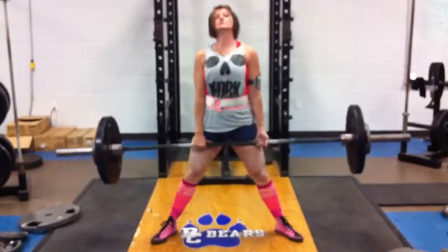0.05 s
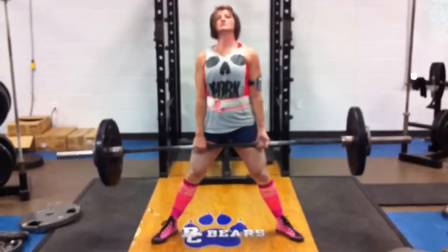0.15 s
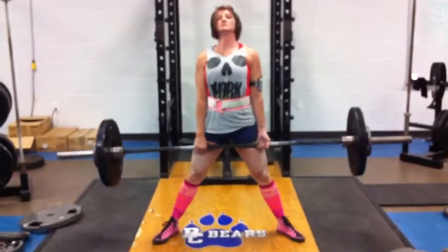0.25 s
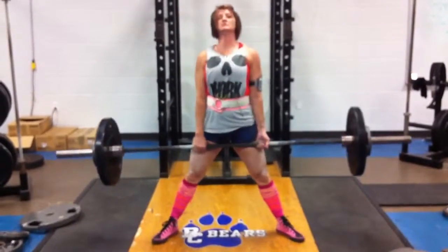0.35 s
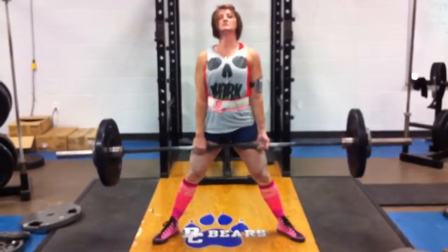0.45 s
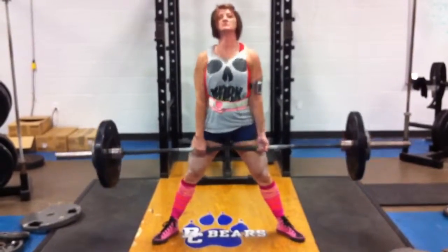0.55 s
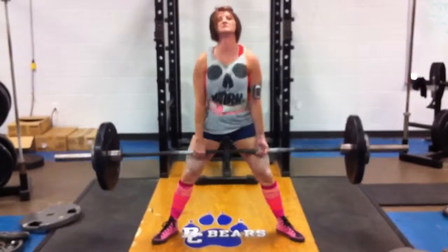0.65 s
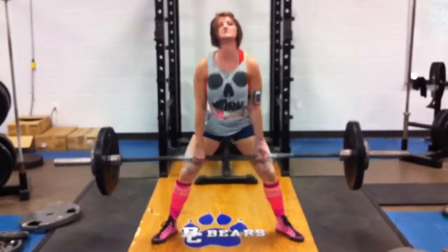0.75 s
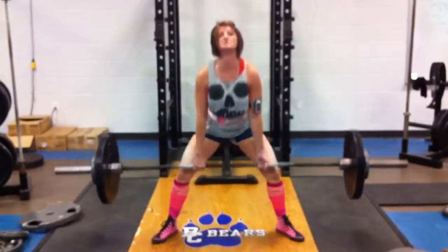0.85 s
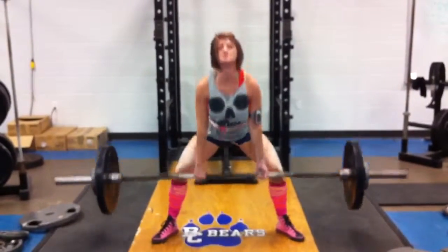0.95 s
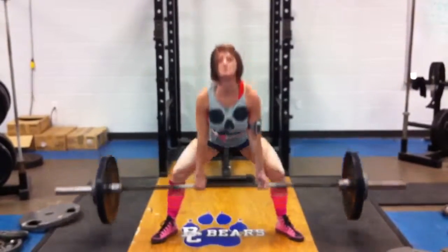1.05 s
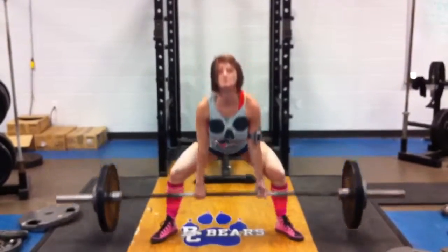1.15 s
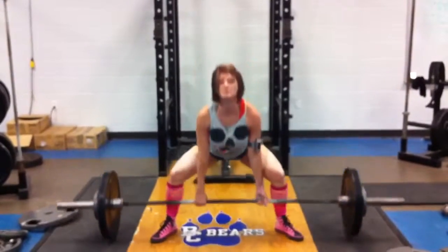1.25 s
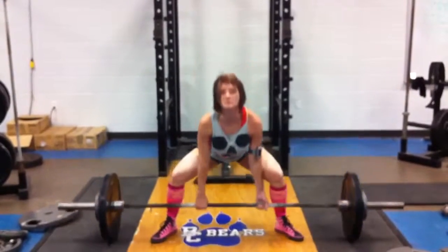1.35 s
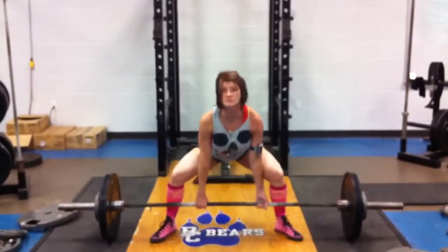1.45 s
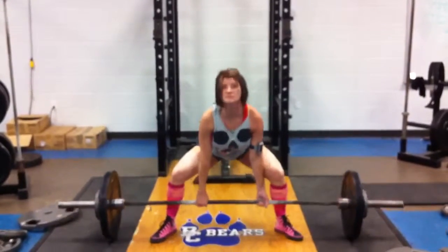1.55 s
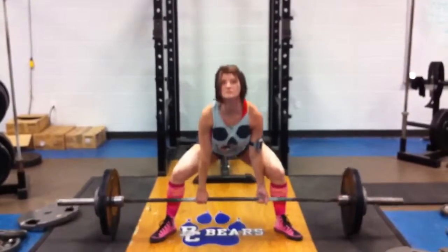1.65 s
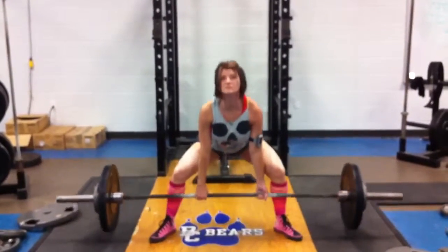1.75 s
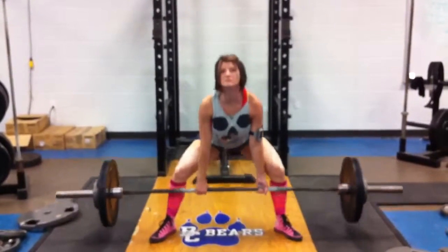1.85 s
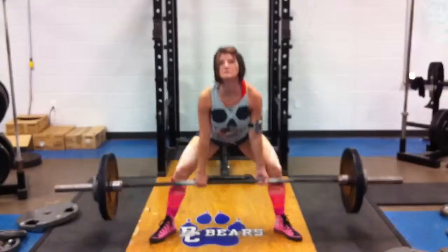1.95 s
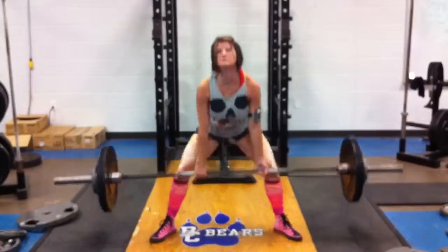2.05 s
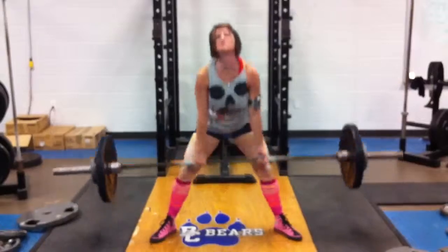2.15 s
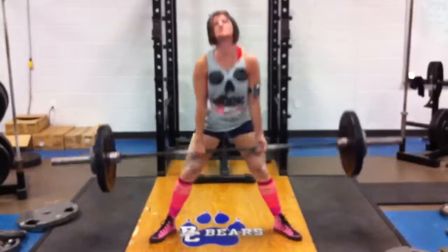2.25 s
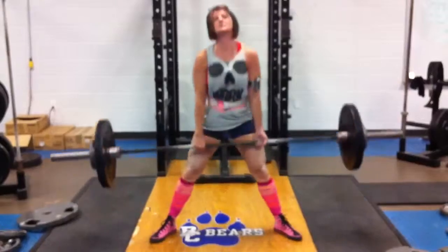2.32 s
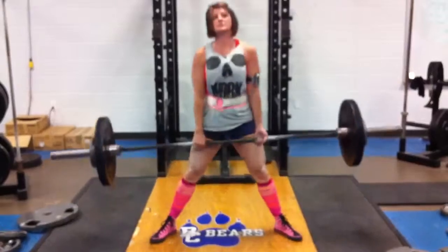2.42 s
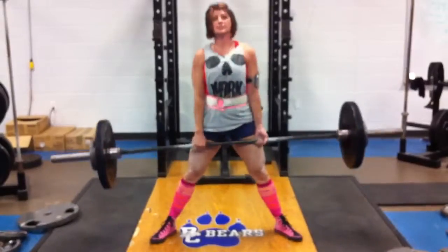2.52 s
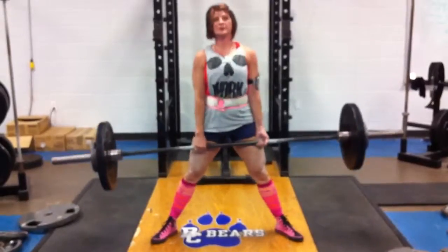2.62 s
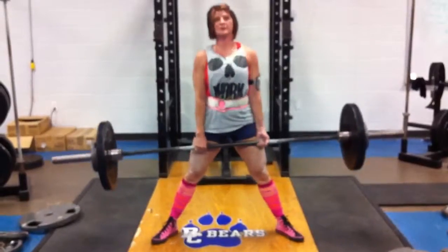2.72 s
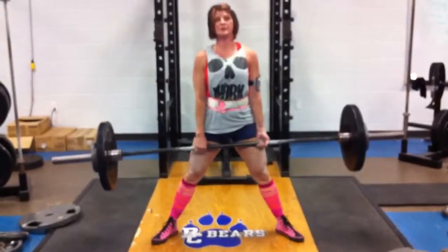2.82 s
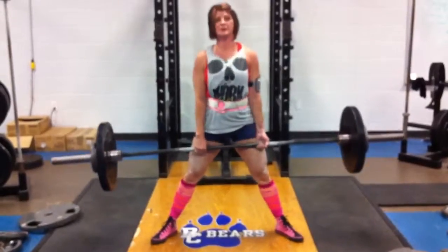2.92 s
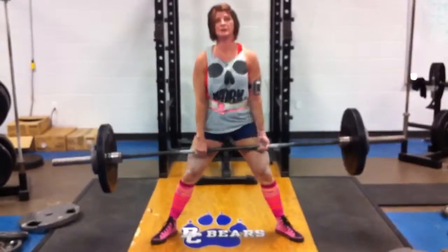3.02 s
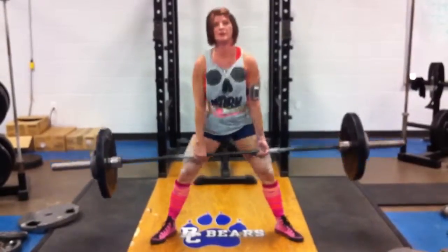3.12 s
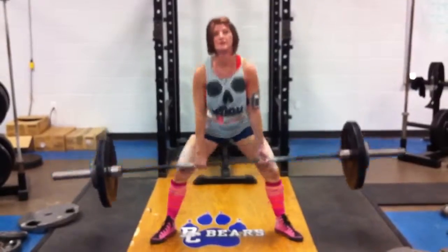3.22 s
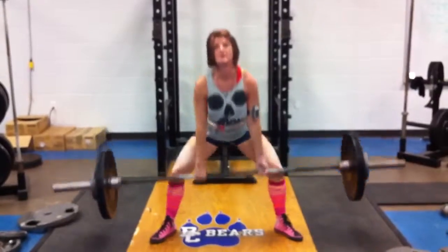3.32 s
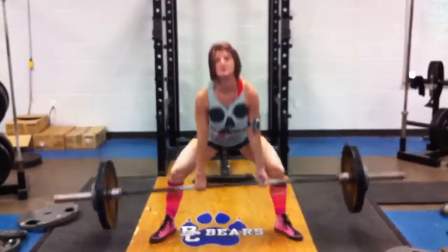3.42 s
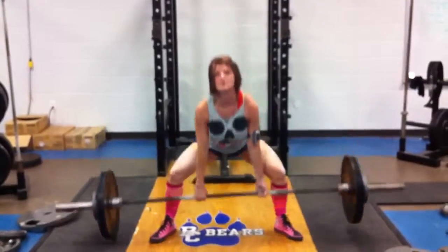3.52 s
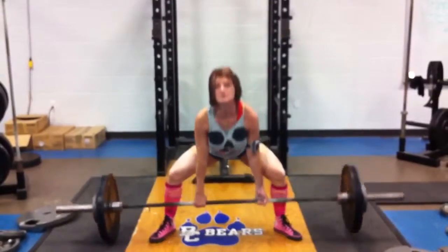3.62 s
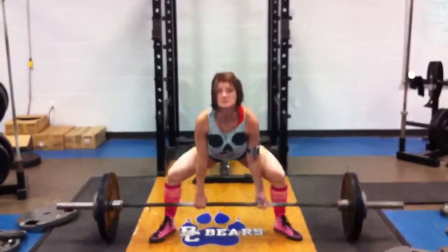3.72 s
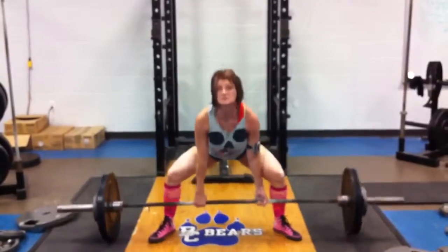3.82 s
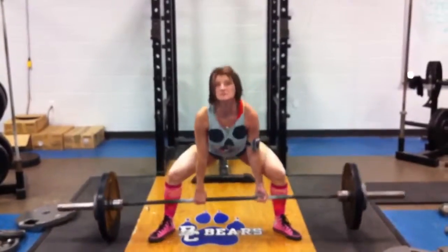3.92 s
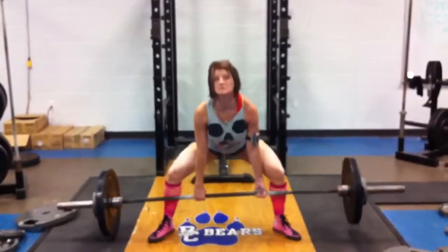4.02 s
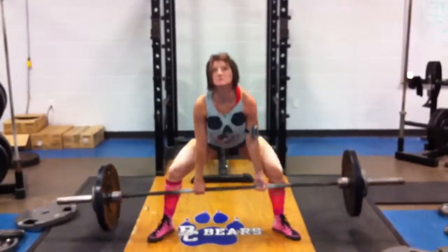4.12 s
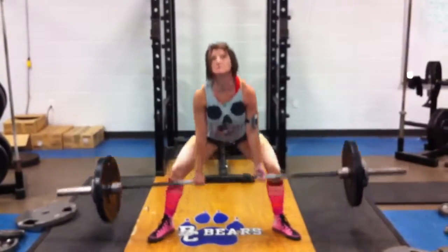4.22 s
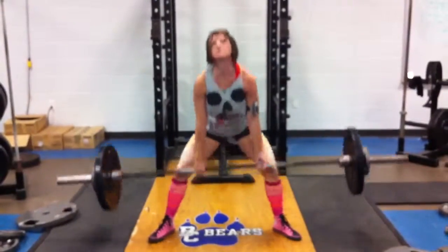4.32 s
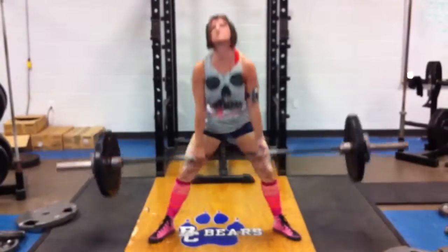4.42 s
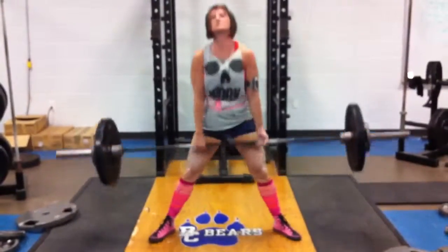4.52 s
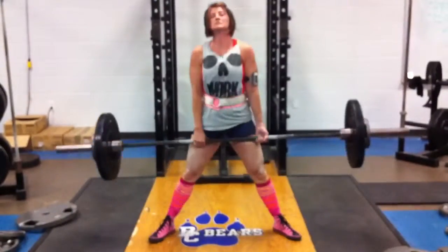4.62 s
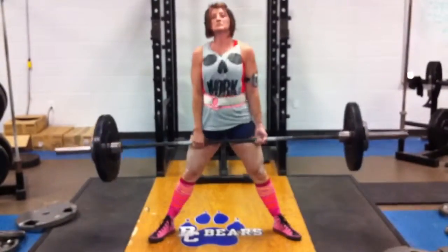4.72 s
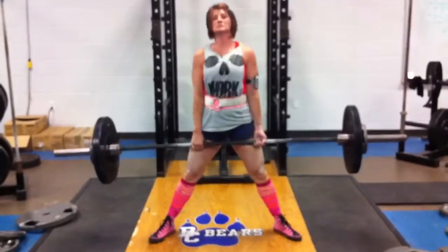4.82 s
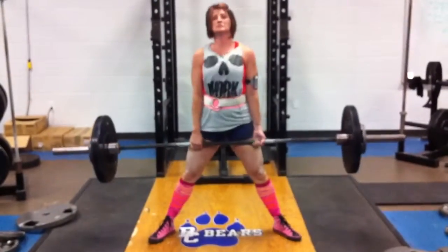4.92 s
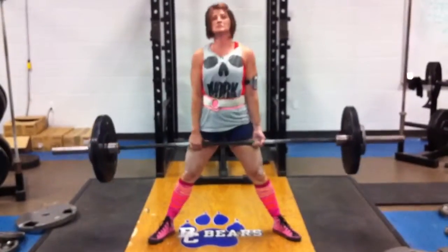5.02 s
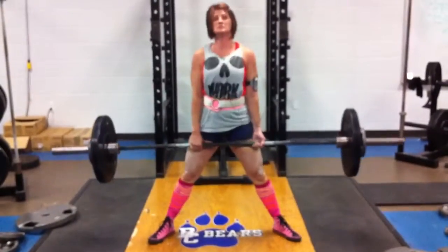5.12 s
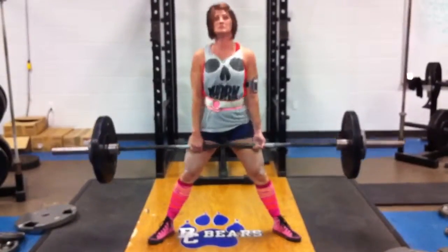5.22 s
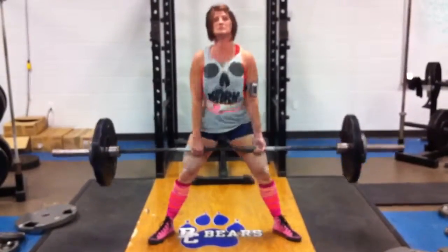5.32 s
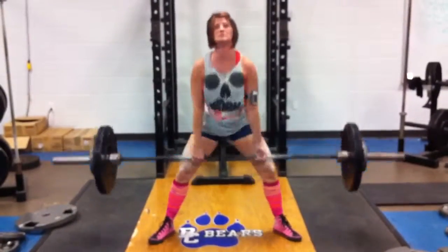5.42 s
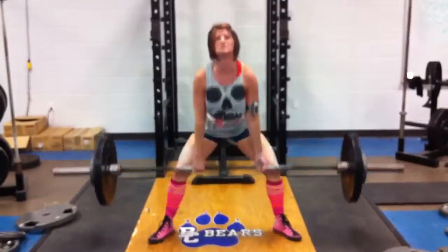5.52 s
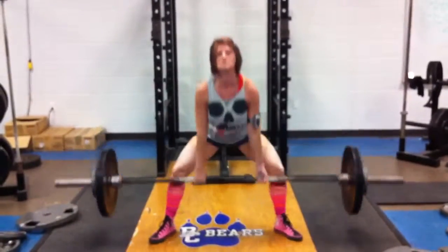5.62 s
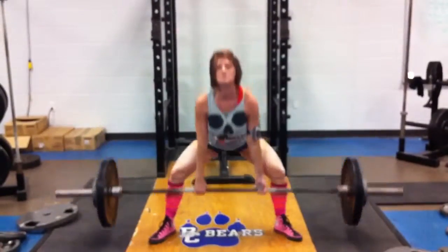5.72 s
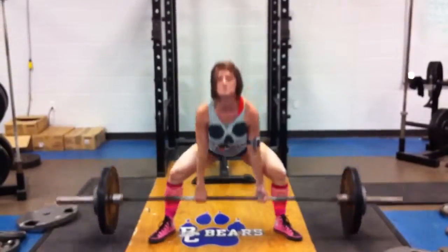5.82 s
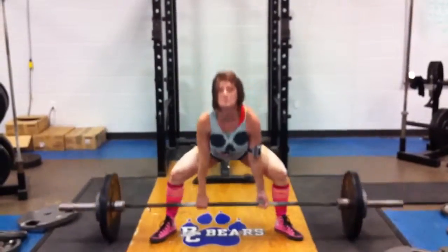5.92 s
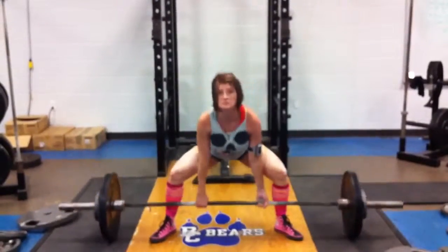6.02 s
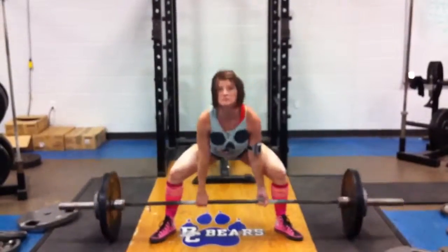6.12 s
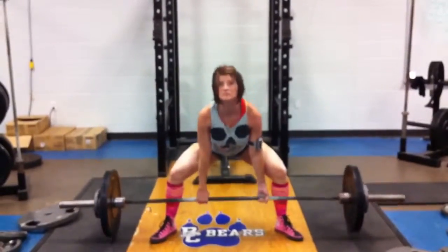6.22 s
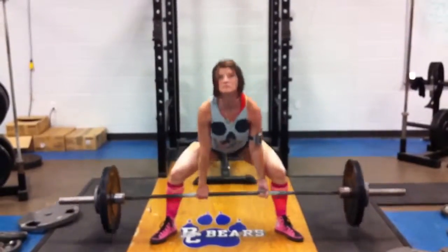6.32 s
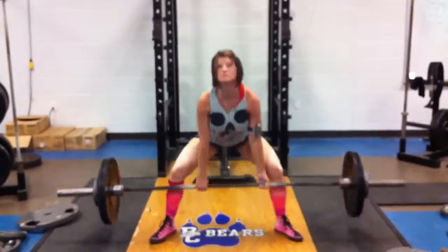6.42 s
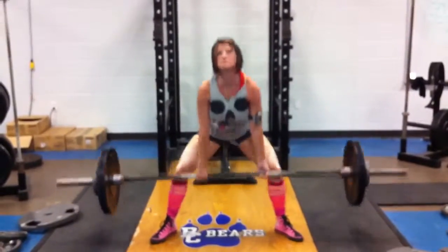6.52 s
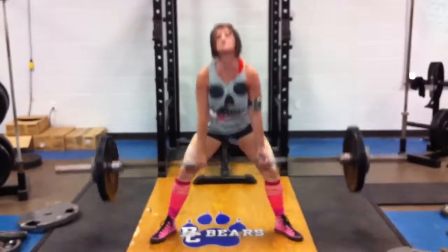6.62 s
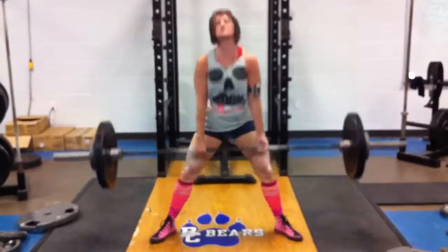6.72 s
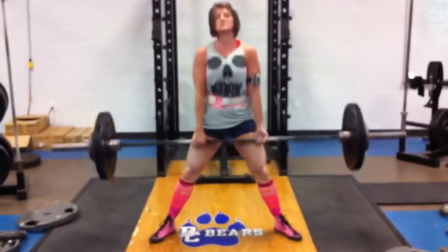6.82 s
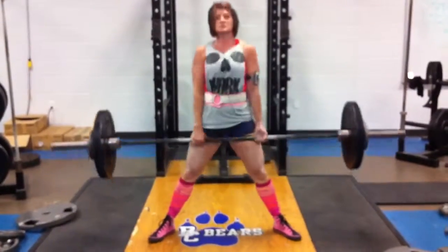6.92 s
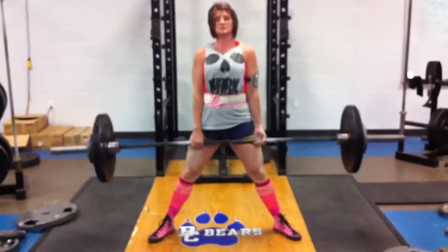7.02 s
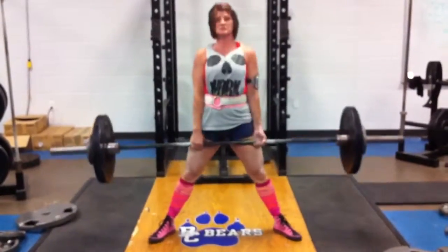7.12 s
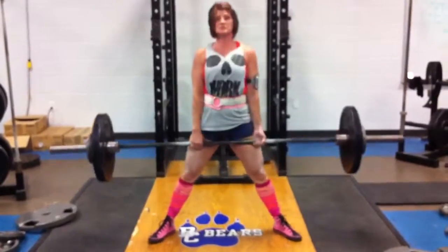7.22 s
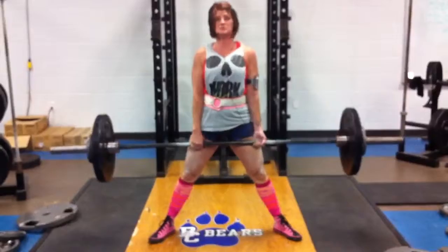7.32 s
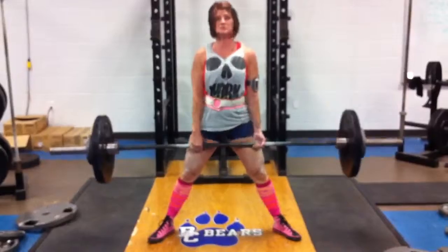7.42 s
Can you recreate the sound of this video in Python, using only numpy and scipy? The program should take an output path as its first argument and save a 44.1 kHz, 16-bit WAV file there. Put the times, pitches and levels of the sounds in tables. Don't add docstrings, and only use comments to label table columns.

```python
import sys
import numpy as np
from scipy import signal
from scipy.fft import rfft, irfft, next_fast_len
from scipy.io import wavfile
from scipy.ndimage import uniform_filter1d

SR = 44100
rng = np.random.default_rng(int(sys.argv[2]) if len(sys.argv) > 2 else 0)


def master(y):
    cut = np.clip(np.atleast_2d(y).T, -1, 1)
    pcm = np.round(cut * 32767)
    wavfile.write(sys.argv[1], SR, pcm.astype(np.int16))


def gain_from_db(level_db):
    decades = np.asarray(level_db, float) / 20
    return 10 ** decades


N = 328924
SPAN = 3 * SR

# freq_hz, level_db (per Hz)
AIR_SPECTRUM = [(35, -76), (60, -18), (202, -7), (232, -9.5), (255, -5.5), (287, -8.5), (322, -4),
                (564, -8), (764, -6), (1860, -8), (3030, -6), (6550, -16.5), (11500, -21.5), (15900, -30)]
AIR_DB = -37
# freq_hz, width_hz, level_db
FAN_DRONE = [(154.1, 8.3, -65.5), (262.1, 7, -55), (320.4, 13.4, -55.5), (375, 5.8, -61.5), (419.3, 7, -57),
             (476.6, 8.9, -57), (531, 9.8, -58), (804, 9.1, -74), (1128, 18, -57)]
# time_s, level_db
FAN_HUM = [
    (0.0, -64),
    (1.2, -57),
    (1.9, -67),
    (3.7, -50),
    (4.3, -55),
    (6.1, -53),
    (6.85, -62),
    (7.46, -54),
]
HUM_HZ = 210
# freq_hz, width_hz, level_db
GRILLE = (2960, 640, -47.5)

# start_s, strength_db, chatter_ms
LANDINGS = [
    [(1.458, 1.5, 8.1), (1.480, 5, 29), (1.516, -2.5, 6), (1.562, 0.5, 33), (1.685, -9, 11),
     (1.850, -14.5, 6.3)],
    [(3.747, 4, 22), (3.803, -1.5, 9.8), (3.856, -3.5, 5.6), (3.880, 4, 13), (3.928, -9, 7),
     (3.975, -9.5, 17), (4.018, -19, 8), (4.085, -25, 13), (4.121, -26, 11), (4.397, -31, 12)],
    [(6.050, 5, 24), (6.095, 6.5, 29), (6.150, -2, 4.1), (6.205, -7.5, 6.7), (6.356, -16.5, 7.9),
     (6.520, -29, 14), (6.610, -36, 11)],
]
# bar_db, plates_db, plate_brightness_db (per octave)
BLOW_SHARE = [
    (11, 9, 2.2),
    (7.5, 8.5, -1),
    (11.5, 9.5, -2),
]
# mode_hz, extra_db
BELLIES = [
    [(5822, 6), (3290, 3), (3838, 2)],
    [(2058, 5), (1215, 4), (2372, 2), (2938, 3.5)],
    [(2372, 7), (3290, 4.5), (3765, 4), (6282, 3), (1215, 3)],
]
# freq_hz, level_db (per Hz)
CLATTER_SPECTRUM = [(900, -26.5), (1230, -4), (1750, -12), (2400, -7), (3000, -1), (3700, -7.5),
                    (4300, -9.5), (6000, -6.5), (8000, -15.5), (9700, -14), (10600, -6.5), (12000, -11),
                    (13200, -20), (16000, -38.5)]
CLATTER_DB = [-31.5, -31.5, -31]
# freq_hz, level_db (per Hz)
CRACK_SPECTRUM = [(500, -24), (1500, -7.5), (3700, -0.5), (6000, -10), (10500, -2), (12500, -8),
                  (16000, -24)]
CRACK_DB = 5
FLOOR_DB = [0, 4, -4]
TILT_DB, TILT_PER_DB, THUD_DB, THUD_PER_DB = 0.5, 0.72, -39.5, 1.8

BAR_HZ = [2058, 2372, 2765, 3090, 3445, 3765, 4199, 4592, 4960, 5388, 5822, 6282, 6743, 7173, 7657, 8143,
          8653, 9155, 9676, 10228, 10710, 11290, 11782, 12340, 12908, 13493, 14063, 14647, 15238]
BAR_LEVELS = [-39.5, -39.5, -46.5, -35, -36.5, -45.5, -49, -44.5, -39.5, -41.5, -37.5, -41.5, -37.5, -37,
              -41, -37.5, -34.5, -47, -43, -38, -46, -44, -48, -40, -45, -42, -45, -44, -47]
PLATE_HZ = [818, 1110, 1155, 1215, 1303, 1615, 1879, 2837, 2938, 2985, 3208, 3290, 3838, 3915, 5168, 10331,
            10460, 10535, 10605, 10900]
PLATE_LEVELS = [-54, -48, -40.5, -42.5, -41.5, -61, -50.5, -51, -31.5, -30.5, -47, -35.5, -39, -67, -40,
                -49, -36.5, -31.5, -30, -48]
# freq_hz, t60_s
IRON_T60 = [(1000, .18), (3000, .2), (6000, .2), (9000, .22), (10500, .15), (14000, .3)]
FREE_T60 = {2372: .3, 2938: .6, 3290: .6, 5822: .35}
TWIN_HZ = 26

# freq_hz, t60_s
ROOM_T60 = [(200, 1.2), (800, 1.67), (1500, 1.51), (3000, 1.67), (6000, 1.5), (10000, 0.86), (15000, 0.48)]
ROOM_DB = 3.5

DIP_DB = [8.5, 5.5, 7]
DIP_S, RECOVER_DB_S, REST_DB = 0.084, 5, 0.64
# freq_hz, level_db
TREBLE_FLOOR = [(5000, -70), (7500, -52), (10000, -54), (12000, -53), (13200, -52), (14500, -54),
                (15500, -56)]
TOP_HZ, BASS_HZ = 15900, 90


def level(x, db):
    return x * gain_from_db(db) / np.sqrt(np.mean(x ** 2))


def on_log(hz, table):
    f, v = np.transpose(table)
    return np.interp(np.log(np.maximum(hz, 1)), np.log(f), v)


def colour(x, table):
    size = 2048
    hz = np.arange(size // 2 + 1) * SR / size
    cepstrum = irfft(np.log(gain_from_db(on_log(hz, table))))
    cepstrum[1:size // 2] *= 2
    cepstrum[size // 2 + 1:] = 0
    taps = irfft(np.exp(rfft(cepstrum)))[:size // 2]
    return signal.fftconvolve(x, taps / np.sqrt(np.sum(taps ** 2)))[:len(x)]


def walk(rate):
    hold = int(SR / rate)
    steps = np.repeat(rng.standard_normal(N // hold + 1), hold)
    return uniform_filter1d(uniform_filter1d(steps, hold), hold)[:N]


def band(hz, width):
    edges = [hz - width / 2, min(hz + width / 2, SR / 2.2)]
    sos = signal.butter(2, edges, "band", fs=SR, output="sos")
    return level(signal.sosfilt(sos, rng.standard_normal(N)), 0)


def ventilation():
    rush = colour(rng.standard_normal(N), AIR_SPECTRUM)
    swell = walk(0.59)
    size = next_fast_len(N)
    spectrum, f = rfft(rush, size), np.fft.rfftfreq(size, 1 / SR)
    edges = 20 * 2 ** np.arange(0, 10.1, .5)
    air = 0
    for lo, hi in zip(edges, edges[1:]):
        part = irfft(spectrum * ((f >= lo) & (f < hi)), size)[:N]
        air = air + part * gain_from_db(.5 * swell + 1.1 * walk(6))
    drone = sum(gain_from_db(db + 3.0 * walk(2.5)) * band(hz, width) for hz, width, db in FAN_DRONE)
    hum = gain_from_db(np.interp(np.arange(N) / SR, *np.transpose(FAN_HUM))) * band(HUM_HZ, 8.)
    grille_hz, grille_width, grille_db = GRILLE
    whistle = gain_from_db(grille_db + walk(5.05)) * band(grille_hz, grille_width)
    return level(air, AIR_DB) + drone + hum + whistle


def contacts(rows):
    chatter, thud = np.zeros(SPAN), np.zeros(SPAN)
    t = np.arange(SR // 8) / SR
    for start, db, ms in rows:
        tilt_db = TILT_DB + TILT_PER_DB * db
        thud_db = THUD_DB + THUD_PER_DB * db
        i = int((start - rows[0][0]) * SR)
        knocks = rng.standard_normal(len(t)) * gain_from_db(3.37 * rng.exponential(size=len(t)))
        rise = (1 - np.exp(-t / 0.0081)) ** 2
        burst = knocks * rise * np.exp(-t / (max(ms, 1) / 1000))
        burst = burst / np.sqrt(np.sum(burst ** 2))
        burst = colour(burst, [(1000, -.8 * tilt_db), (2800, 0.0044), (15000, tilt_db)])
        chatter[i:i + len(t)] += gain_from_db(db) * burst
        push = rng.standard_normal(len(t)) * np.exp(-t / 0.02)
        thud[i:i + len(t)] += gain_from_db(thud_db) * push
    return chatter, colour(thud, [(40, -46), (140, -1), (280, 0), (600, -10), (1400, -20), (20000, -70)])


def gym():
    t, tail = np.arange(SPAN) / SR, 0
    for hz in 100 * 2 ** np.arange(0, 7.5, .5):
        decay = gain_from_db(-60 * t / on_log(hz, ROOM_T60))
        tail = tail + np.sqrt(hz) * band(hz, hz / 3.22)[:SPAN] * decay
    tail = tail * (1 - np.exp(-t / 0.0038))
    return 1 + gain_from_db(ROOM_DB) * rfft(tail / np.sqrt(np.sum(tail ** 2)))


def add_mode(heard, blows, hz, energy):
    bins = np.arange(int((hz - 700) * SPAN / SR), int((hz + 700) * SPAN / SR))
    split = TWIN_HZ * rng.uniform(0.72, 1) * np.array([[-.5], [.5]])
    t60 = FREE_T60.get(hz, on_log(hz, IRON_T60))
    poles = np.exp((2j * np.pi * (hz + split) - np.log(1000) / t60) / SR)
    ring = np.sum(1 / (1 - poles * np.exp(-2j * np.pi * bins / SPAN)), axis=0)
    pair = blows[bins] * ring
    heard[bins] += pair * np.sqrt(energy * SPAN / (2 * np.sum(np.abs(pair) ** 2)))


def barbell():
    out = np.zeros(N + SPAN)
    for k, rows in enumerate(LANDINGS):
        chatter, thud = contacts(rows)
        room = gym()
        clatter = gain_from_db(CLATTER_DB[k] + 43.0) * colour(chatter, CLATTER_SPECTRUM)
        crack = gain_from_db(CRACK_DB) * colour(chatter, CRACK_SPECTRUM)
        heard = room * rfft(clatter)
        heard += rfft(crack + gain_from_db(FLOOR_DB[k]) * thud)
        blows = room * rfft(chatter)
        bar_db, plate_db, bright_db = BLOW_SHARE[k]
        octaves = np.log2(np.divide(PLATE_HZ, 3000))
        bar_levels = np.add(BAR_LEVELS, bar_db)
        plate_levels = np.add(PLATE_LEVELS, plate_db) + bright_db * octaves
        for hz, db in zip(np.r_[BAR_HZ, PLATE_HZ].tolist(), np.r_[bar_levels, plate_levels]):
            db += sum(extra_db for belly_hz, extra_db in BELLIES[k] if abs(belly_hz / hz - 1) < .004)
            held = SR * on_log(hz, ROOM_T60) / (2 * np.log(1000))
            add_mode(heard, blows, hz, held * gain_from_db(db) ** 2)
        i = int(rows[0][0] * SR)
        out[i:i + SPAN] += irfft(heard, SPAN)
    return out[:N]


def scene():
    return np.tile(ventilation() + barbell(), (2, 1))


def gain_control():
    t, dip = np.arange(N) / SR, 0
    for rows, db in zip(LANDINGS, DIP_DB):
        since = t - rows[0][0]
        fall = db * since / DIP_S
        climb = db - RECOVER_DB_S * (since - DIP_S)
        dip = np.maximum(dip, np.minimum(fall, climb))
    return gain_from_db(REST_DB - dip)


def thin_treble(x):
    size = 2048
    f, _, z = signal.stft(x, SR, nperseg=size)
    power = np.abs(z) ** 2
    total = power.sum(axis=0)
    attack = total > 4.0 * np.roll(total, 2)
    floor = total * (total * 1000) ** .4 * gain_from_db(2 * on_log(f, TREBLE_FLOOR))[:, None]
    strong = uniform_filter1d(power, size=3, axis=0) > floor
    keep = (strong | attack) & (f < TOP_HZ)[:, None]
    return signal.istft(z * keep, SR, nperseg=size)[1][:N]


def band_limit(x):
    return signal.sosfilt(signal.butter(12, 16300, fs=SR, output="sos"), x)


def record(dry):
    limited = np.tanh(dry[0] * gain_control() / .7) * .7
    bass_cut = signal.butter(2, BASS_HZ, "high", fs=SR, output="sos")
    x = thin_treble(signal.sosfilt(bass_cut, limited))
    return band_limit(np.tile(x, (2, 1)))


dry = scene()
out = record(dry)
master(out)
```